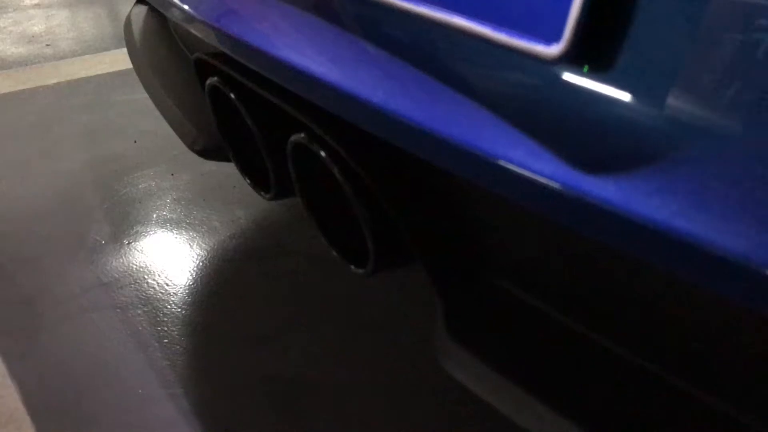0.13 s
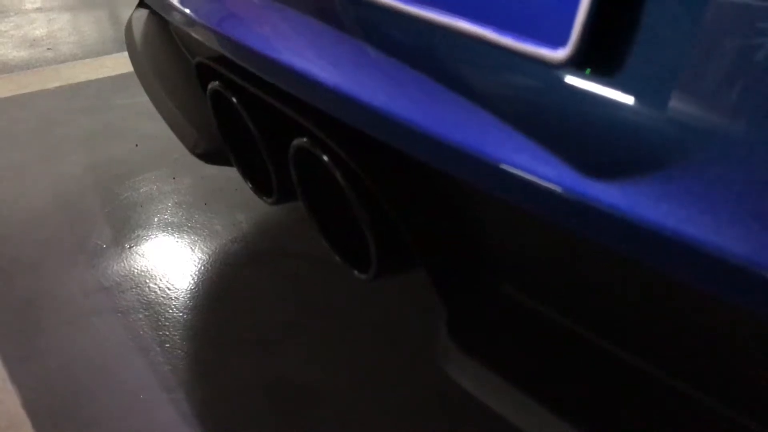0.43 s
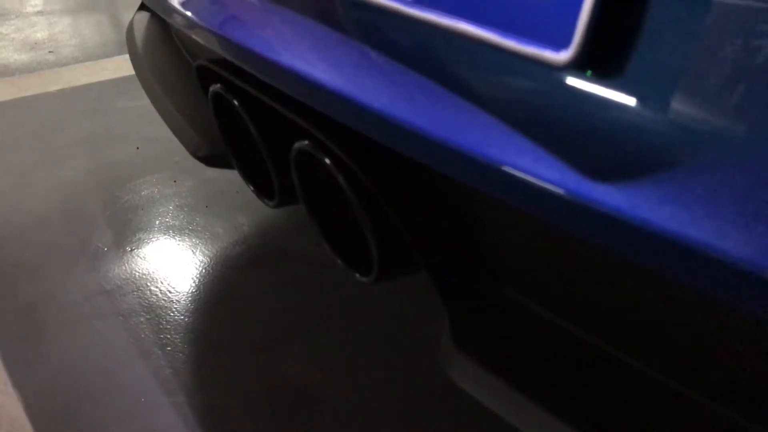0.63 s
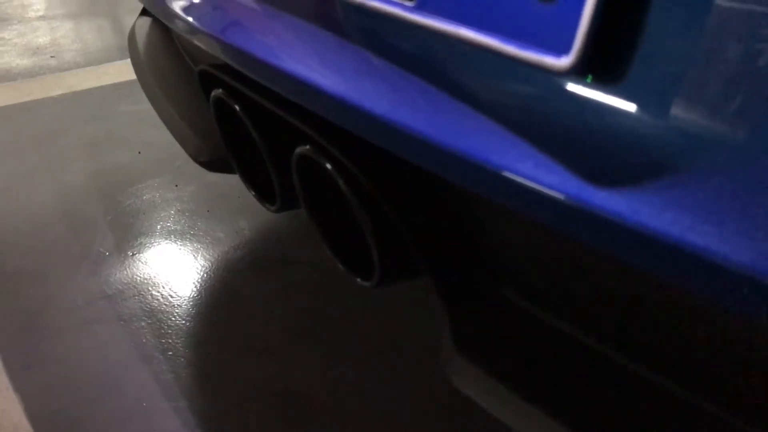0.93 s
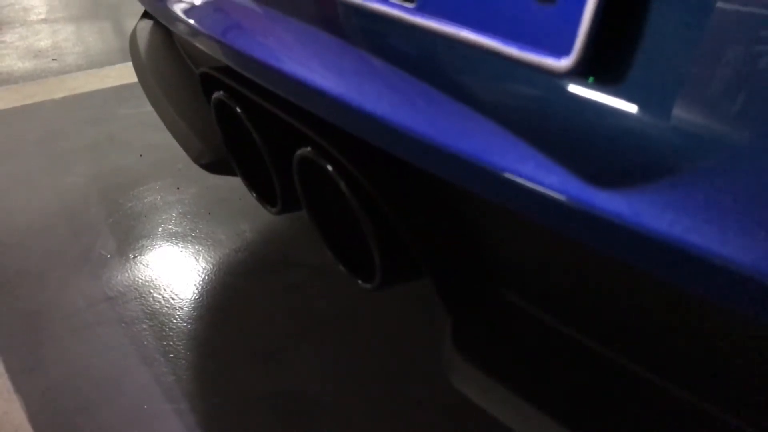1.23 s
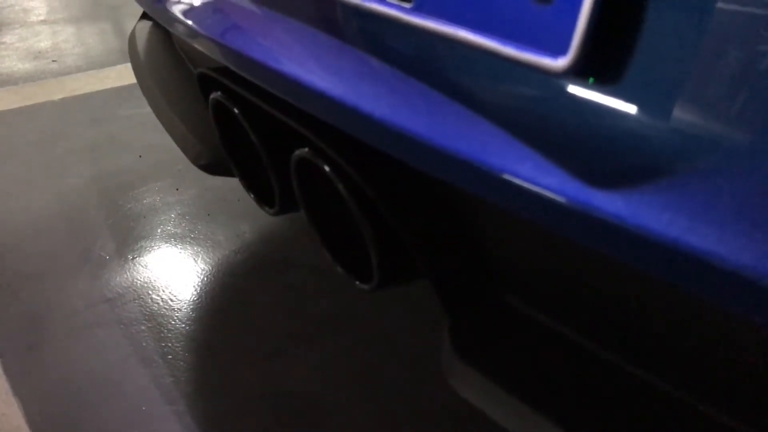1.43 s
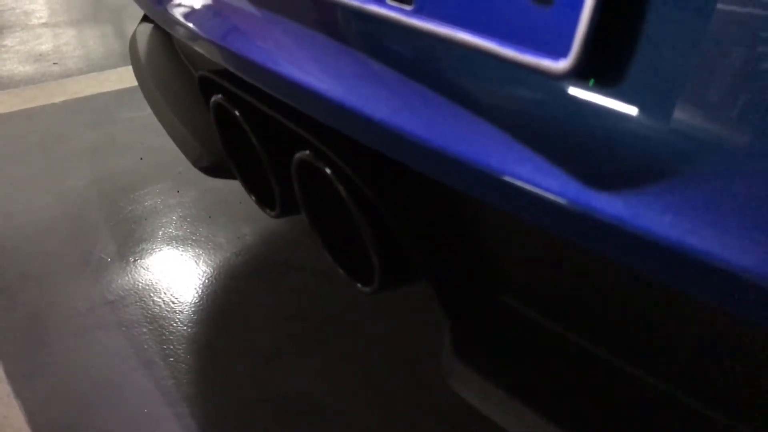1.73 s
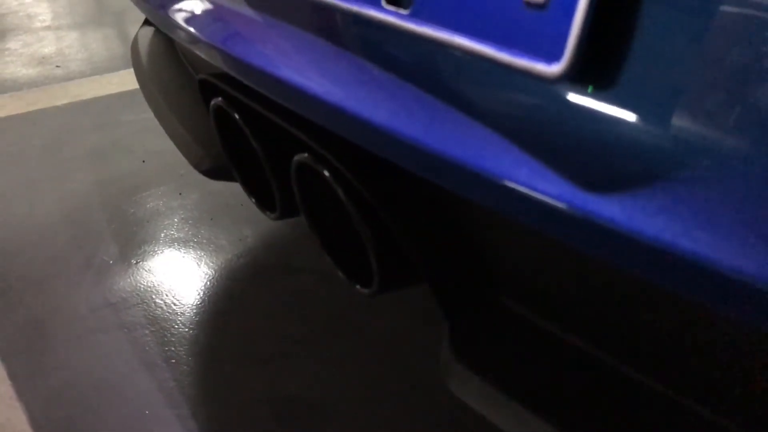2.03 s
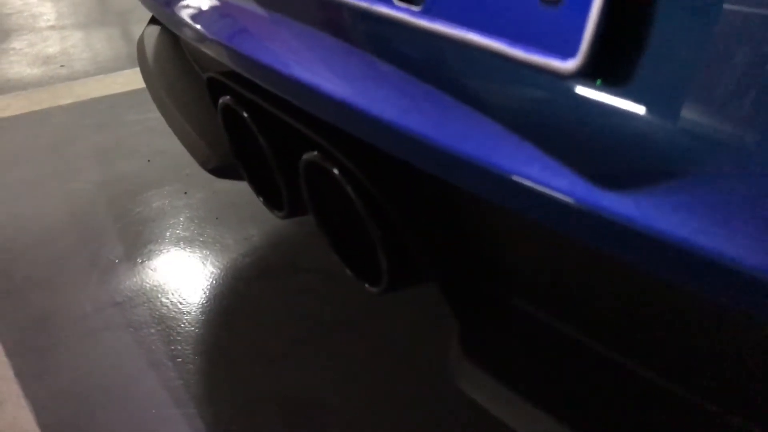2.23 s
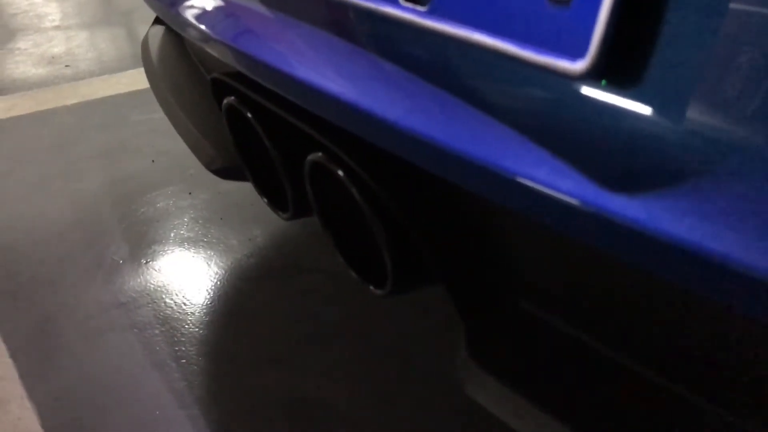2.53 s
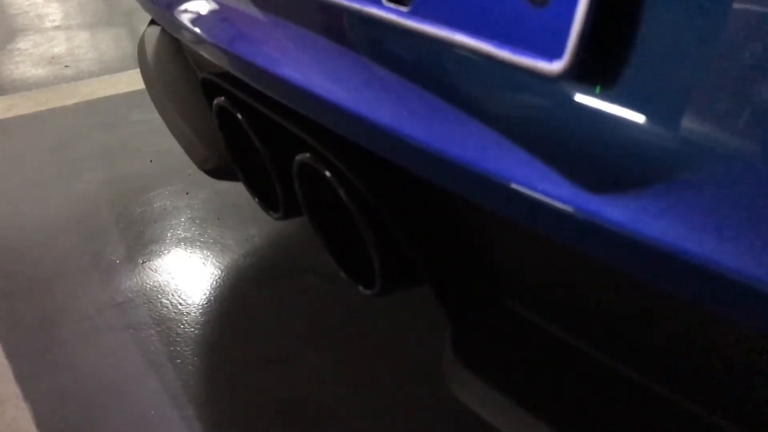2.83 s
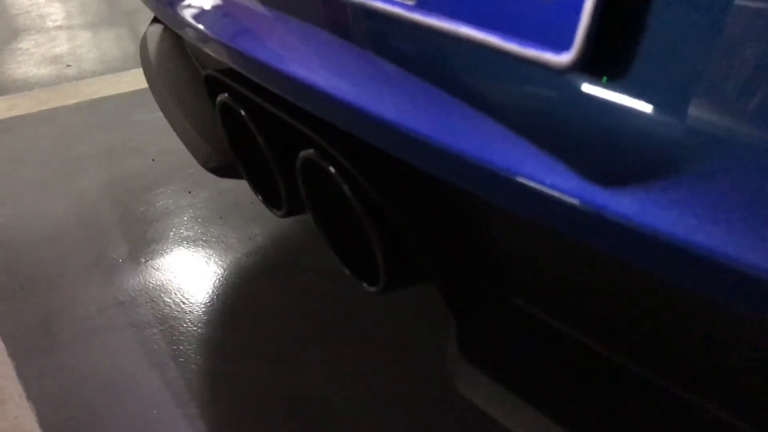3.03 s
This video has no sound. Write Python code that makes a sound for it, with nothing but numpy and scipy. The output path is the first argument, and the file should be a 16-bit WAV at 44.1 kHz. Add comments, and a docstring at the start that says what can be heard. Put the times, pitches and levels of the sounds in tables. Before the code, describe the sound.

Car exhaust idling close up, low throbbing rumble with faint rasp, soft ticking and sparse spits.

```python
"""A six-cylinder car idles in a concrete garage, heard close to its tailpipes, over a low garage wash.
After a brief silence the idle fades in: each firing thumps through the silencer as a filtered impulse,
and puffs of noise ring the pipe, some of them harder so that it rasps; now and then one fires weakly.
Injectors tick softly ahead of the firings as struck resonances, and gas hisses as pulsing noise.
From about 0.6 s the exhaust sometimes spits a sharp, bright tick of decaying noise."""
import sys
import numpy as np
from scipy import signal
from scipy.fft import rfft, irfft, next_fast_len
from scipy.io import wavfile
from scipy.ndimage import map_coordinates

SR = 44100
rng = np.random.default_rng(int(sys.argv[2]) if len(sys.argv) > 2 else 0)


def bounce(signal):
    """Save signal as a 16-bit WAV file at the path given by the first command-line argument."""
    frames = np.transpose(np.atleast_2d(signal))
    limited = np.clip(frames, -1, 1)
    pcm = np.round(limited * 32767).astype(np.int16)
    wavfile.write(sys.argv[1], SR, pcm)


N = 139797
T = np.arange(N) / SR  # time in seconds
CYLINDERS = 6


def amp(db):
    """Level to amplitude: 20 dB is a factor of ten."""
    return 10 ** (np.asarray(db) / 20)


def unit(x):
    """Normalisation by mean power: scale to rms 1."""
    return x / np.sqrt(np.mean(x ** 2) + 1e-20)


def along(points, hz):
    """Logarithmic frequency scale: read (Hz, value) points at hz by interpolation."""
    point_hz, values = np.transpose(points)
    return np.interp(np.log(hz + 1), np.log(point_hz + 1), values)


def filtered(x, response):
    """Linear filtering: multiply the spectrum by a complex frequency response."""
    size = 2 * next_fast_len(N)  # zero padding leaves room for the ringing
    hz = np.fft.rfftfreq(size, 1 / SR)
    return irfft(rfft(x, size) * response(hz), size)[:N]


def colour(points):
    """Minimum phase: the causal response with a given (Hz, dB) shape, by folding its cepstrum."""
    def response(hz):
        cepstrum = irfft(np.log(amp(along(points, hz))))
        half = len(cepstrum) // 2
        cepstrum[1:half] *= 2
        cepstrum[half + 1:] = 0
        return np.exp(rfft(cepstrum))
    return response


def resonances(modes):
    """Modal superposition: a sum of damped resonators, each (centre Hz, width Hz, peak dB)."""
    def response(hz):
        return sum(amp(db) * 1j * hz * width / (centre ** 2 - hz ** 2 + 1j * hz * width)
                   for centre, width, db in modes)
    return response


def noise(points):
    """Spectral shaping: white noise coloured by (Hz, dB) points, at rms 1."""
    return unit(filtered(rng.standard_normal(N), colour(points)))


def wobble(rate):
    """Slow random modulation: a smooth curve through rate random knots a second."""
    knots = rng.standard_normal(int(N * rate / SR) + 4)
    return map_coordinates(knots, [T * rate])


def pulses(times, sizes):
    """Impulsive excitation: one single-sample impulse at each time."""
    samples = np.clip(np.round(times * SR).astype(int), 0, N - 1)
    return np.bincount(samples, sizes, N)


def gate(phase, centre, width):
    """Periodic modulation: a Gaussian bump per firing; centre and width in firing intervals."""
    distance = (phase - centre + .5) % 1 - .5
    return np.exp(-.5 * (distance / width) ** 2)


def puffs(phase, times, modes, centre, width, scatter_db):
    """Resonance driven by noise: a burst of random size per firing rings the modes; rms 1."""
    size = amp(np.interp(T, times, scatter_db * rng.standard_normal(len(times))))
    bursts = size * gate(phase, centre, width) * rng.standard_normal(N)
    return unit(filtered(bursts, resonances(modes)))


def crank():
    """Four-stroke cycle: each cylinder fires every second turn, so firings count the crank's angle."""
    # Crank speed. Each row: time in seconds, speed in rpm.
    speed = [(0.0, 813.6), (0.14, 819.7), (0.27, 784), (0.39, 814), (0.5, 779.5), (0.61, 825.9),
             (0.71, 781), (0.81, 821.3), (0.93, 791), (1.1, 821.4), (1.19, 763.2), (1.3, 806.7), (1.5, 801),
             (1.85, 805.6), (2.05, 796), (2.4, 810), (2.58, 794.4), (3.17, 809)]
    # Weak firings. Each row: time in seconds (the nearest firing is taken), strength in dB.
    weak = [(.2, -5.5), (.45, -25), (.65, -20), (.825, -25), (1.15, -25), (2.497, -9), (2.897, -10)]
    start_phase = -0.0959  # firing intervals
    rpm = np.interp(T, *np.transpose(speed))
    firings_per_s = rpm / 60 * CYLINDERS / 2
    phase = start_phase + np.cumsum(firings_per_s) / SR
    times = np.interp(np.arange(int(phase[-1]) + 1), phase, T)
    strength_db = np.zeros(len(times))
    for s, db in weak:
        strength_db[np.argmin(abs(times - s))] = db
    return phase, times, strength_db


def wash(level_db=-36):
    """Broadband background: steady noise, strongest in the bass, fills the garage."""
    # Spectrum of the wash. Each row: frequency in Hz, relative level in dB per Hz.
    wash_colour = [(20, 7), (55, 21), (130, 6.5), (200, 11.5), (280, 2), (480, 4), (650, -5.5), (1200, 0.5),
                   (2200, -2.5), (3500, -29.5), (8000, -49.5)]
    return amp(level_db) * noise(wash_colour)


def garage(x, level_db=-9):
    """Reverberation: convolution with a noise tail that decays faster in the treble."""
    # Decay of the room. Each row: frequency in Hz, time in seconds to fall by 60 dB.
    decay = [(100, 0.87), (1000, 0.65), (5000, 0.29), (15000, 0.26)]
    hz, t, grid = signal.stft(rng.standard_normal(SR), SR, nperseg=256)
    fall = np.exp(-np.log(1000) * t / along(decay, hz)[:, None])
    tail = signal.istft(grid * fall, SR, nperseg=256)[1]
    return amp(level_db) * signal.fftconvolve(x, tail / np.linalg.norm(tail))[:N]


def hiss(phase, level_db=-40.88, flutter_db=1.0, pulsing=0.45):
    """Jet noise: gas hisses at the pipe mouth, swelling a little between firings."""
    # Spectrum of the hiss. Each row: frequency in Hz, relative level in dB per Hz.
    hiss_colour = [(1500, -19), (2400, -4), (2700, -1), (3000, -5), (3600, 1), (4400, 0.5), (4900, -3.5),
                   (6400, -5.5), (7100, -5.5), (7700, -9.5), (8300, -8.5), (9700, -10), (10400, -13.5),
                   (11300, -10), (14700, -9.5), (15700, -9)]
    flow = amp(flutter_db * wobble(70)) * (1 + pulsing * gate(phase, centre=0.44, width=0.14))
    return amp(level_db) * unit(flow * noise(hiss_colour))


def injectors(phase, lead=.45, scatter_db=1, ring_s=0.0046):
    """Struck modes: a metallic tick rings lead firing intervals ahead of each firing."""
    # Tick resonances. Each row: frequency in Hz, width in Hz, relative level in dB.
    tick_modes = [(3450, 78, -10), (4440, 240, -17), (5650, 75, 6), (6260, 170, -8), (6860, 120, -19)]
    # Tick level by cylinder. Each entry: level in dB, one cylinder louder than the rest.
    cylinder_db = [-42, -49, -46, -45, -53, -63]
    count = int(phase[-1] + lead)
    firing = np.arange(1, count + 1)
    times = np.interp(firing - lead, phase, T)
    level_db = np.array(cylinder_db)[firing % CYLINDERS] + scatter_db * rng.standard_normal(count)
    ring = filtered(pulses(times, amp(level_db)), resonances(tick_modes))
    # total energy of ticks that each hold their level for ring_s
    rms = np.sqrt(np.sum(amp(level_db) ** 2) * ring_s * SR / N)
    return rms * unit(ring)


def clatter(phase, times, level_db=-50):
    """Forced resonance: a light clatter of noise bursts peaks shortly before each firing."""
    # Clatter resonances. Each row: frequency in Hz, width in Hz, relative level in dB.
    clatter_modes = [(1730, 60, -10), (1968, 59, 3), (2200, 110, -7.5)]
    return amp(level_db) * puffs(phase, times, clatter_modes, centre=-0.14, width=0.16, scatter_db=3.5)


def spits(crackle_db=2):
    """Transient jet noise: bright crackling bursts with a fast rise and exponential decay."""
    # Exhaust spits. Each row: start in seconds, level in dB.
    events = [(.592, -32), (2.092, -30), (2.242, -37), (2.391, -30), (2.839, -32.5), (2.991, -29.5)]
    # Spectrum of a spit. Each row: frequency in Hz, relative level in dB.
    spit_colour = [(800, -25), (2500, -4.5), (5000, -2), (7000, -3.5), (9000, -1), (10400, -2), (12000, -2),
                   (14500, 0), (16000, -4.5)]
    attack_s, hold_s, t60_s = 0.0013, 0.0077, 0.057  # the hold runs from the start
    level = np.zeros(N)
    for s, db in events:
        rise = np.clip((T - s) / attack_s, 0, 1)
        decay = np.exp(-np.log(1000) * np.maximum(T - s - hold_s, 0) / t60_s)
        level += amp(db) * rise * decay
    return level * unit(amp(crackle_db * wobble(1500)) * noise(spit_colour))


def chuff(phase, times, level_db=-46):
    """Shell resonance: a noise burst around each firing rings the silencer's shell."""
    # Silencer shell resonances. Each row: frequency in Hz, width in Hz, relative level in dB.
    shell_modes = [(322.5, 22, 3), (355, 40, -6.5), (445.4, 35, 0.5), (517, 75, -4.5)]
    return amp(level_db) * puffs(phase, times, shell_modes, centre=0.022, width=.12, scatter_db=3.5)


def tailpipe(phase, times, strength_db, level_db=-41.5, scatter_db=2.4, follows=0.37):
    """Pipe resonance: turbulent gas, puffed by each firing, rings the tailpipe."""
    # Tailpipe resonances. Each row: frequency in Hz, width in Hz, relative level in dB.
    pipe_modes = [(744, 16, -4.5), (859, 38, -0.5), (925, 28, -0.5), (1027, 57, 3), (1132, 33, -3.5),
                  (1300, 140, -12.5), (1466, 16, -1.5), (1728, 85, -11), (2656, 570, -14.5)]
    # Puffs that make the pipe rasp. Each row: time in seconds (nearest firing), added level in dB.
    rasps = [(.125, 0), (.3, 5.5), (.725, 7.5), (.8, 4), (.95, 1), (1.225, 6), (1.475, 3), (2.1, 5.5),
             (2.375, 1), (2.55, 2)]
    puff_db = follows * strength_db + scatter_db * rng.standard_normal(len(times))
    for s, db in rasps:
        puff_db[np.argmin(abs(times - s))] += db
    flow = amp(np.interp(T, times, puff_db)) * (.35 + gate(phase, centre=-.08, width=.19))
    turbulence = flow * rng.standard_normal(N)
    return amp(level_db) * unit(filtered(turbulence, resonances(pipe_modes)))


def exhaust(times, strength_db):
    """Impulse response: each firing is a deep thump with a steep front, harder from one cylinder bank."""
    # Thump after the silencer. Each row: frequency in Hz, relative level in dB.
    silencer_colour = [(20, -42.5), (32, -38), (40, -9), (60, -11.5), (80, -8.5), (100, -3.5), (120, 0.5),
                       (140, -12.5), (160, -15.5), (200, -20.5), (240, -31), (300, -53.5), (600, -43.5),
                       (1500, -110)]
    # Steep front of the pulse. Each row: frequency in Hz, relative level in dB.
    front_colour = [(120, -32), (250, -7), (320, 2.5), (480, -1), (650, -7), (900, -4), (1400, -22),
                    (3000, -33)]
    thump_db, front_db = -16, -46  # rms levels
    thump_scatter_db, front_scatter_db = 1.14, 1.5
    jitter_s, bank_db = 0.00037, 9.5  # timing scatter; level between the banks' fronts
    chance = rng.standard_normal((len(times), 3))
    times = times + jitter_s * chance[:, 0]
    bank = np.arange(len(times)) % 2  # the banks fire in turn
    thump_size = amp(strength_db + thump_scatter_db * chance[:, 1])
    front_size = amp(.5 * strength_db - bank_db * bank + front_scatter_db * chance[:, 2])
    thump = filtered(pulses(times, thump_size), colour(silencer_colour))
    front = filtered(pulses(times, front_size), colour(front_colour))
    return amp(thump_db) * unit(thump), amp(front_db) * unit(front)


def scene():
    """Superposition: direct sound of the engine, the garage's reverberation and the low wash."""
    phase, times, strength_db = crank()
    thump, front = exhaust(times, strength_db)
    upper = hiss(phase) + injectors(phase) + clatter(phase, times) + spits()
    upper += chuff(phase, times) + tailpipe(phase, times, strength_db) + front
    # the deep thump stays dry
    return (wash() + garage(upper) + upper + thump)[None]


def record(dry):
    """Band limitation: a 2 ms fade-in after 36 ms of silence, then nothing from 15.8 kHz up."""
    start_s, fade_s, top_hz = .036, .002, 15800
    opened = np.clip((T - start_s) / fade_s, 0, 1)
    return filtered(dry[0] * opened, lambda hz: hz < top_hz)[None]


dry = scene()
out = record(dry)
bounce(out)
```